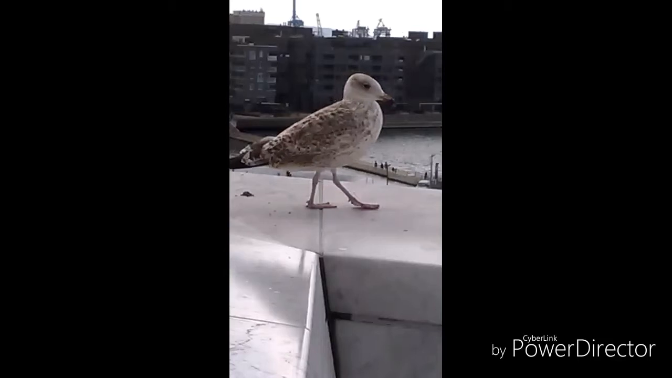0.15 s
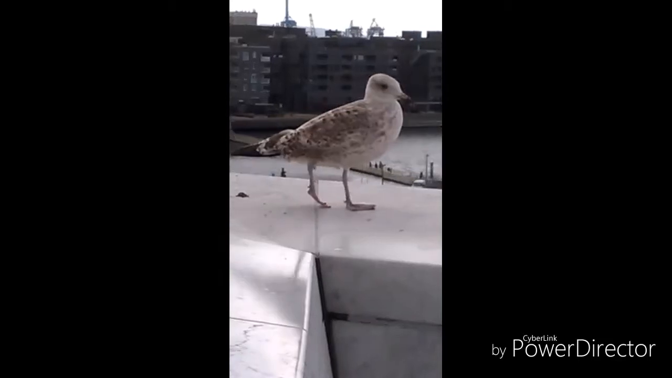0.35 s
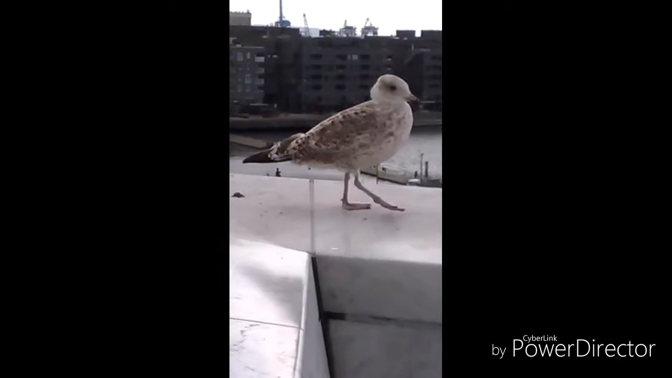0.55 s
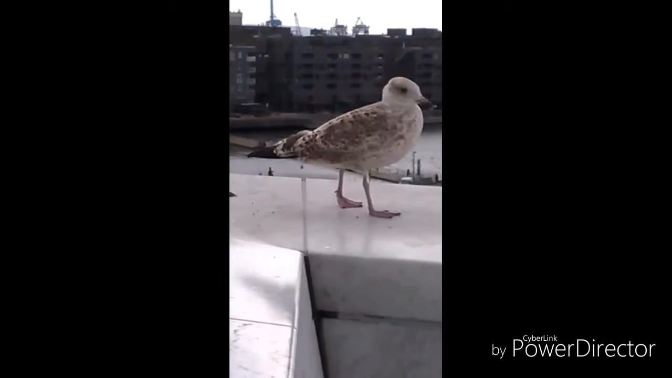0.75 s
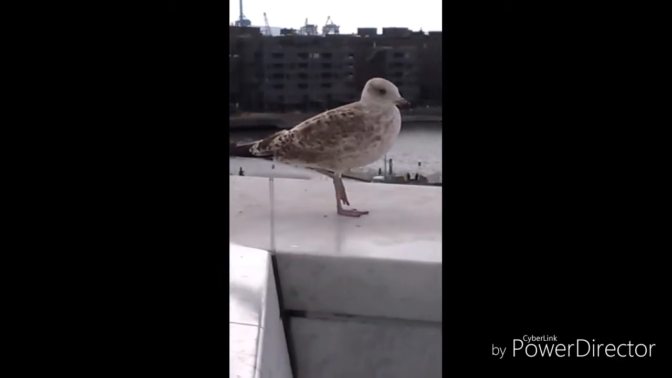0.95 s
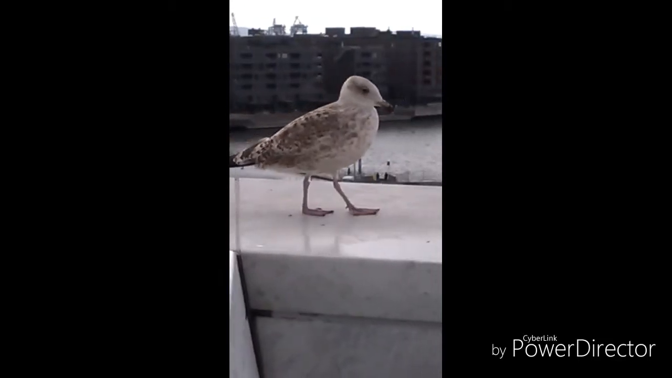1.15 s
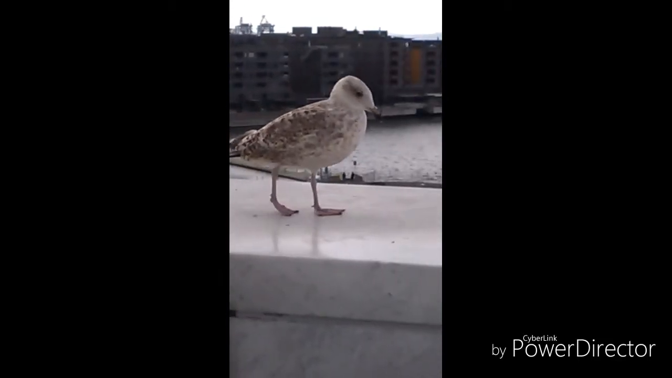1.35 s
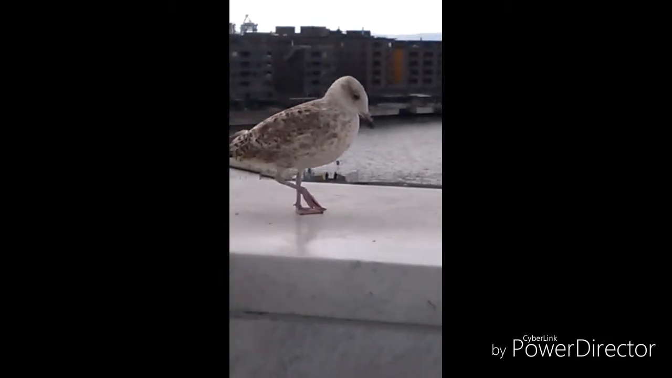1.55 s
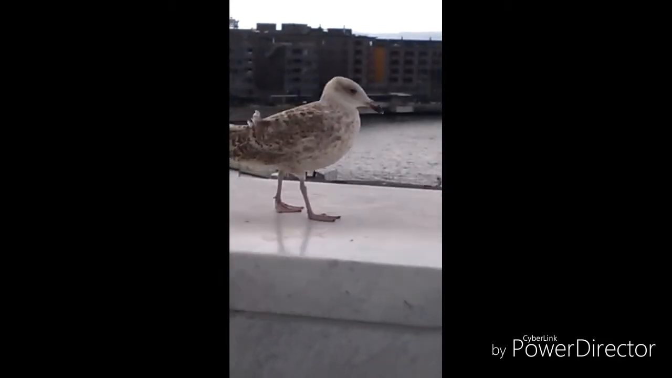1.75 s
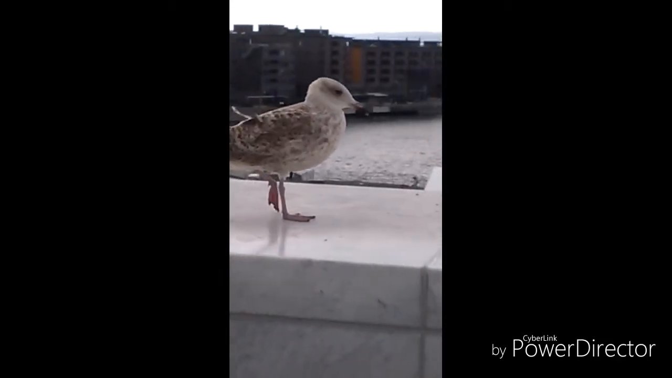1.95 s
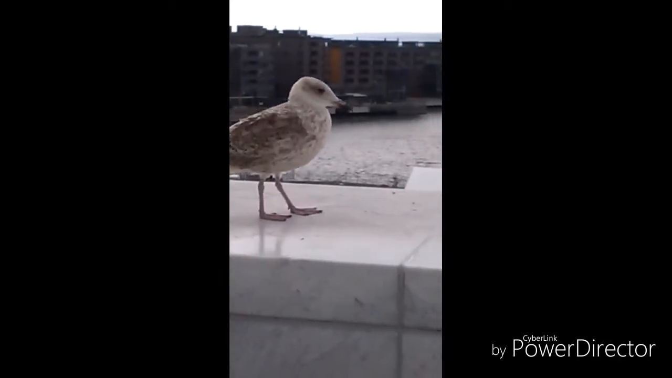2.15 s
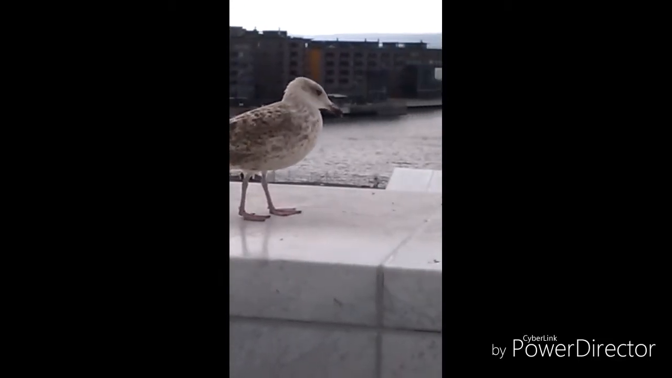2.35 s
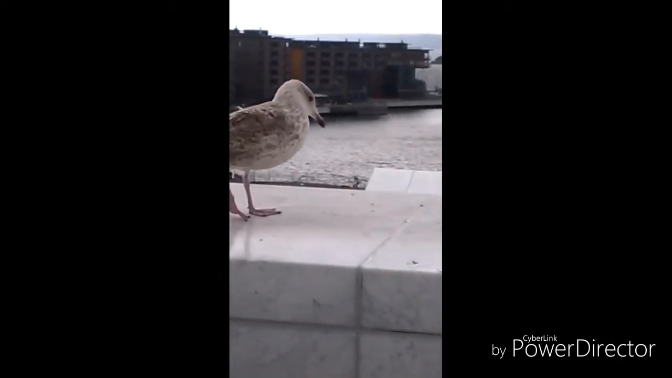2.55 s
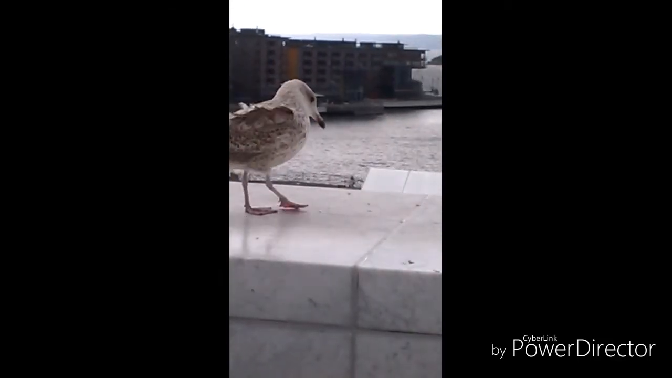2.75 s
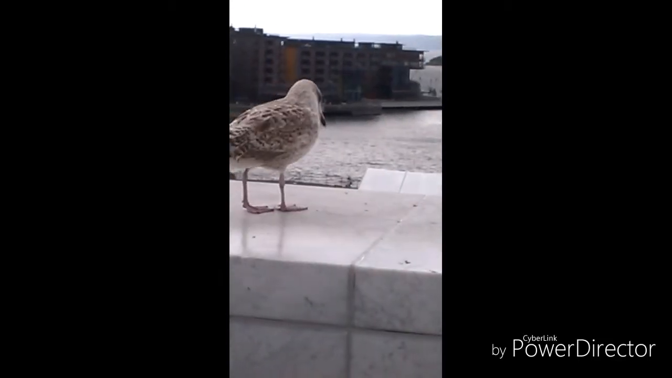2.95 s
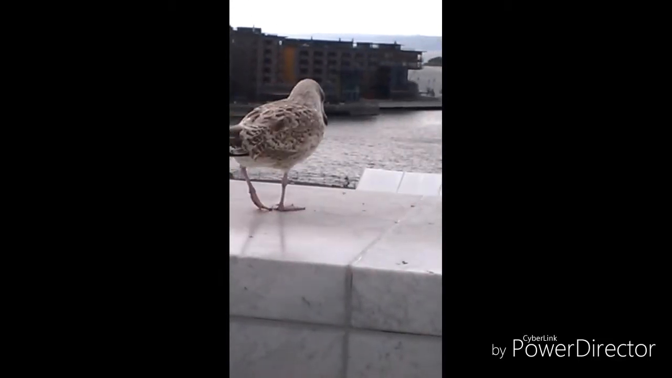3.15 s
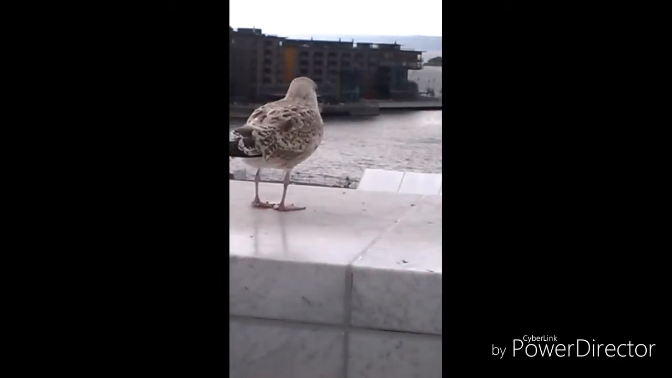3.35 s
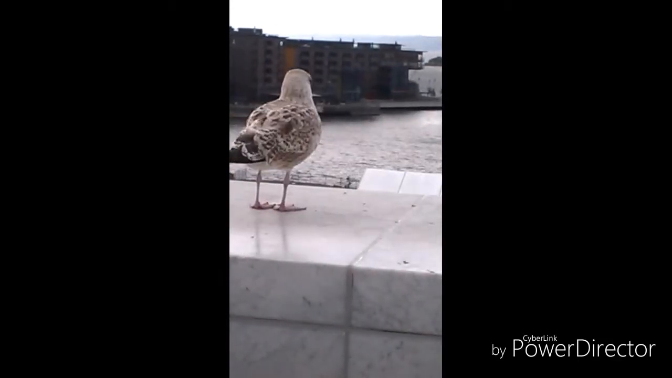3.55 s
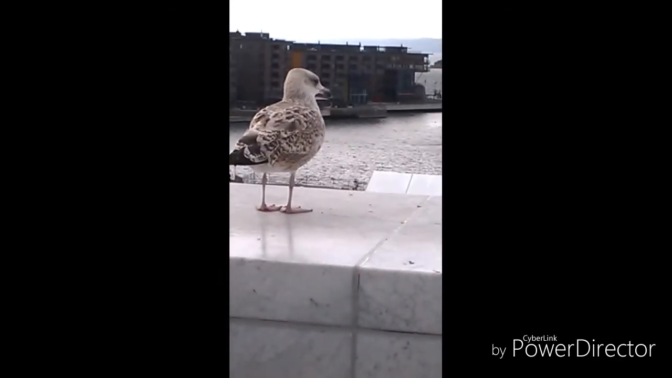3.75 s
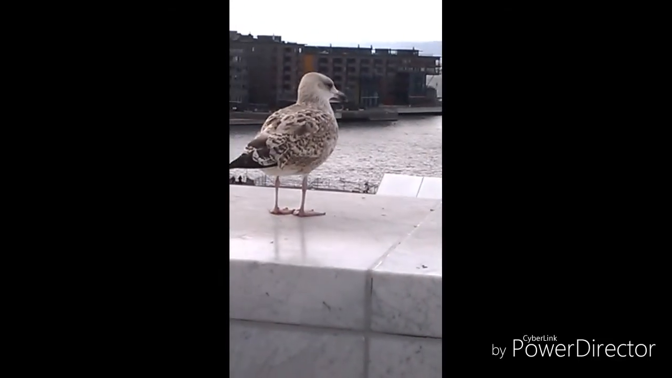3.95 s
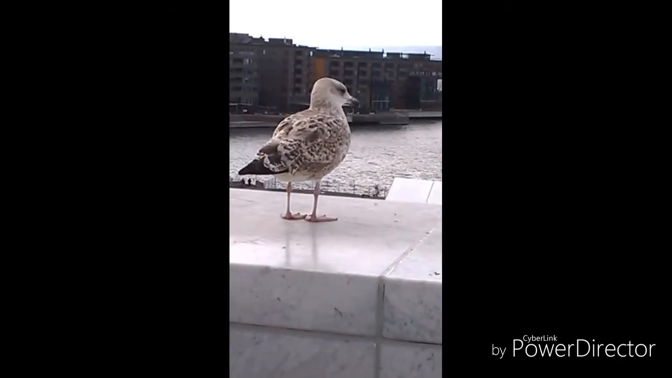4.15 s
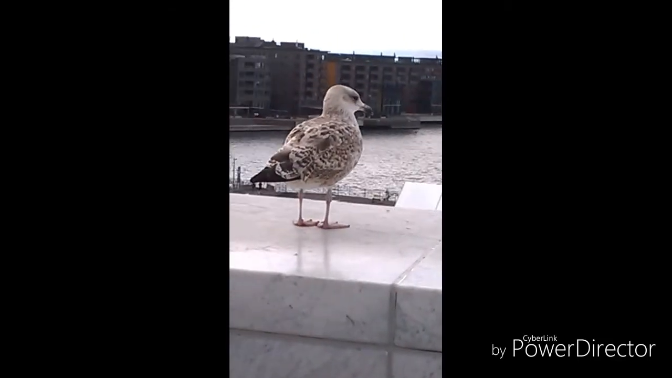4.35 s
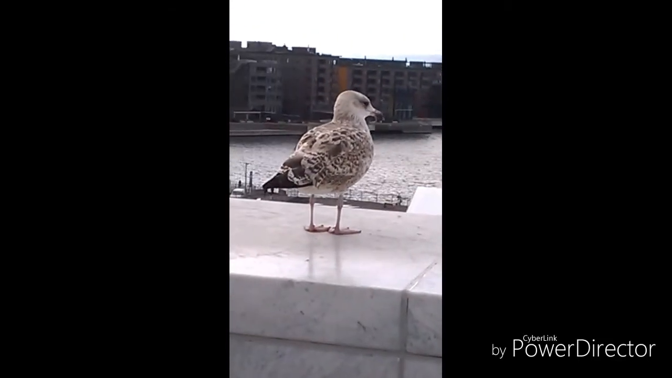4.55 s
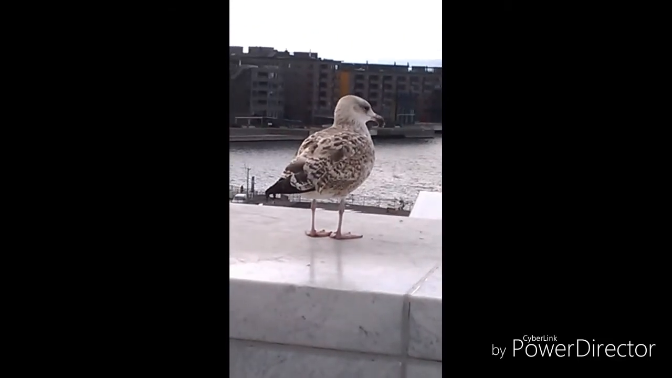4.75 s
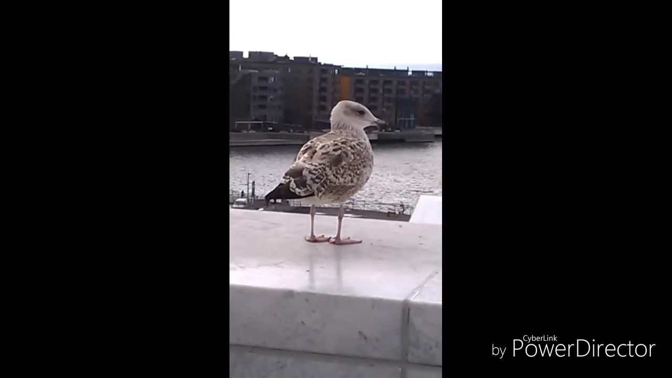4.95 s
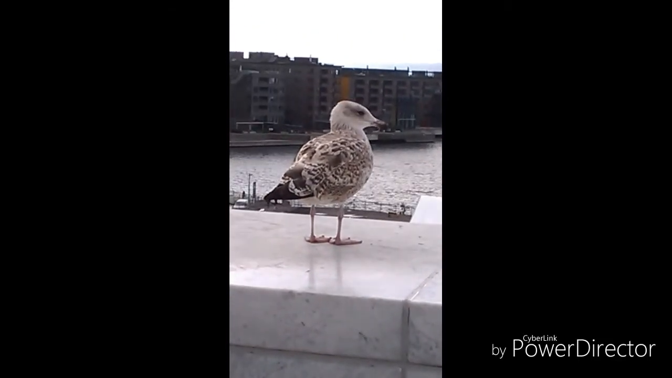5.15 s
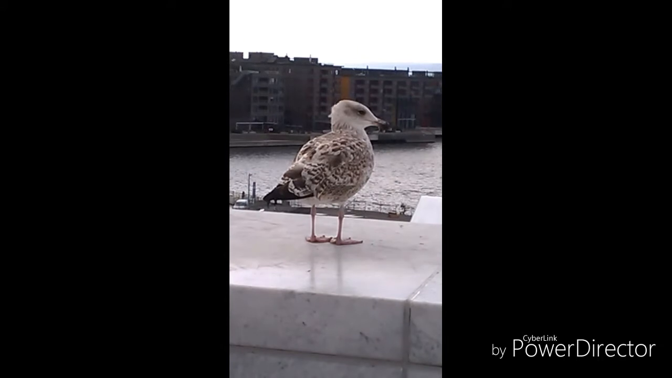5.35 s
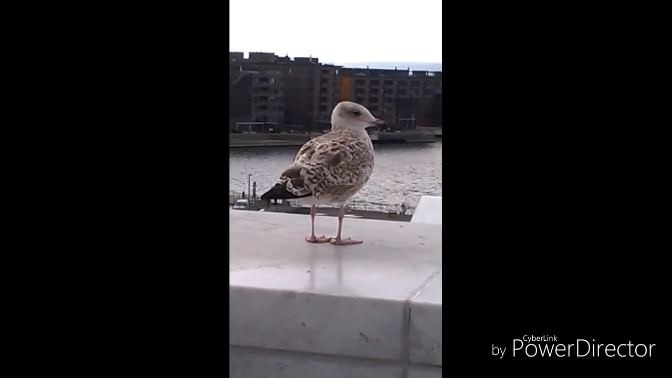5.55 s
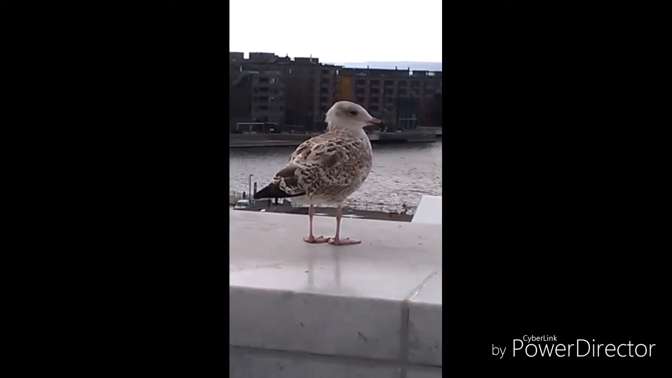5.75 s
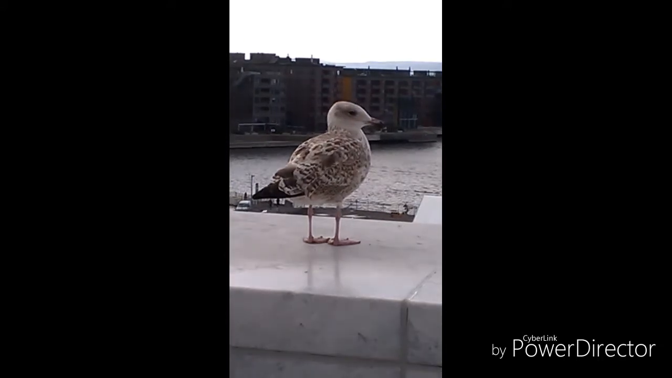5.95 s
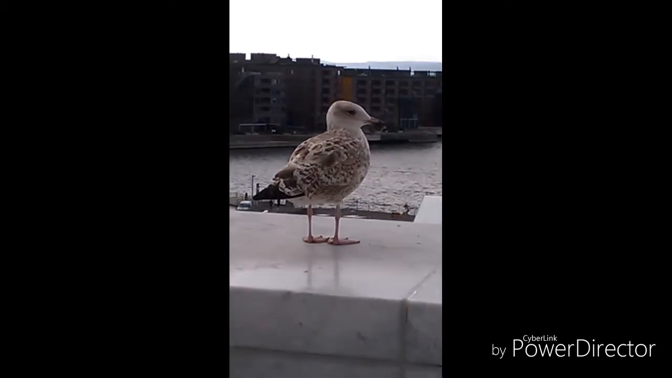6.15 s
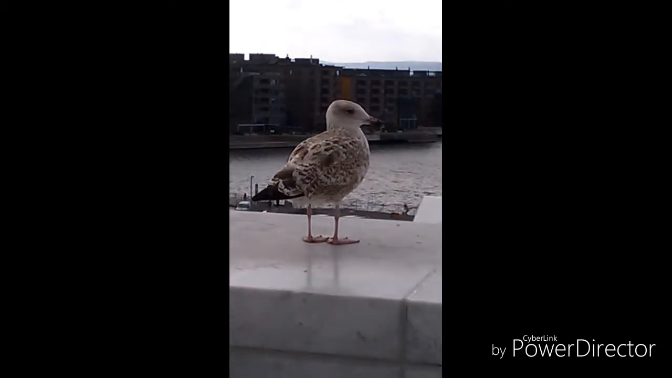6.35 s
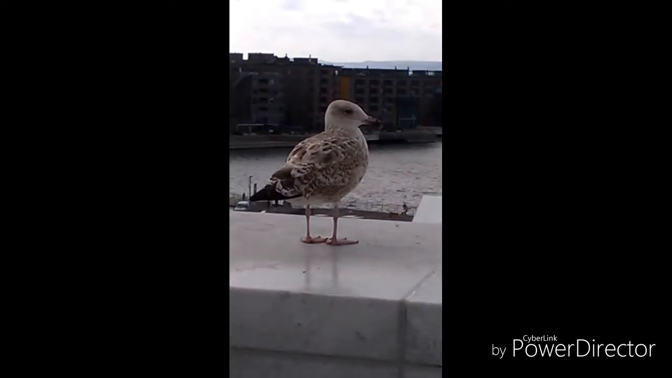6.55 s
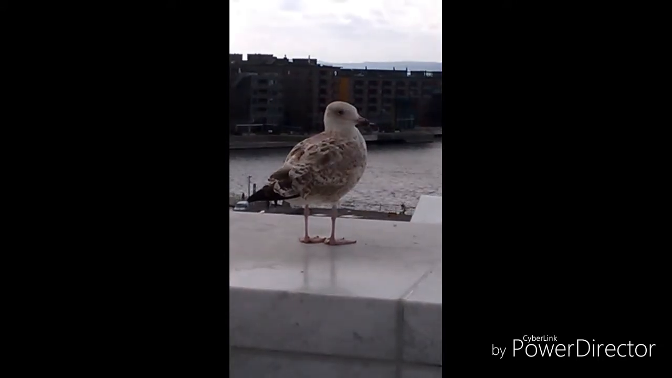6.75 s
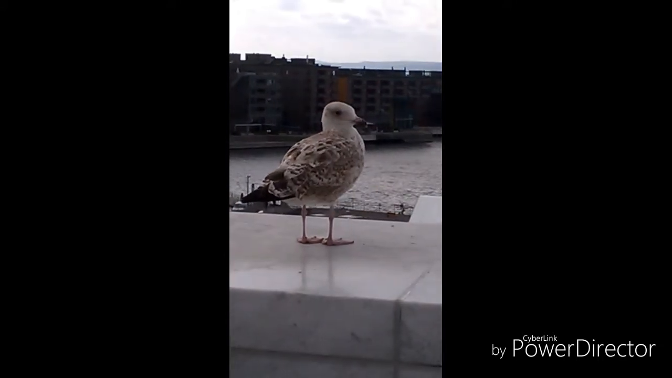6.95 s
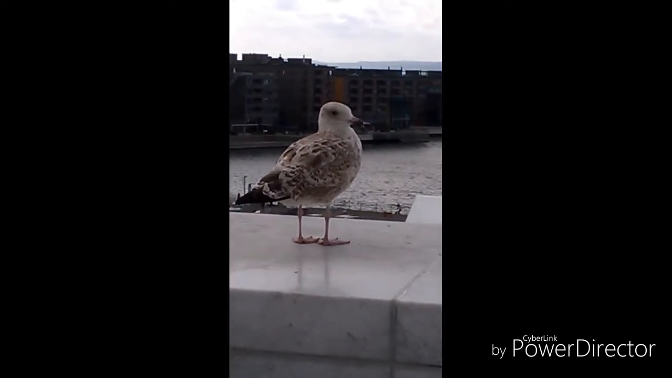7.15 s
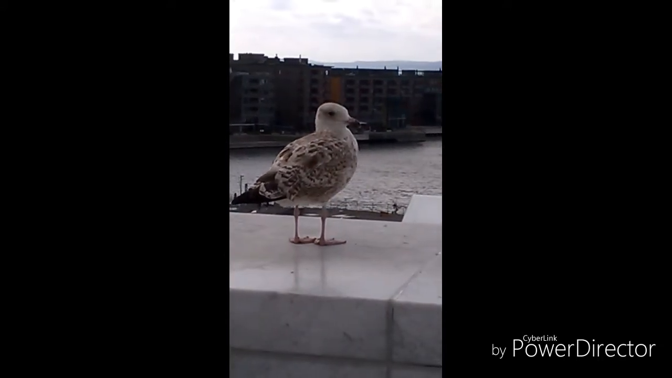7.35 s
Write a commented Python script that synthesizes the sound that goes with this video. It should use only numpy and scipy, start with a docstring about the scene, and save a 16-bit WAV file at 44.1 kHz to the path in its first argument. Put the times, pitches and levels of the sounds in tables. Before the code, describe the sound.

Over rushing wind, water and low town rumble, a nearby gull calls in a long, echoing series of yelps while distant gulls join in.

```python
"""Wind and water rush over the low rumble of a town, swelling in gusts. Young gulls whistle far off and
a foot scuffs the stone. Then a gull on the harbour wall gives a long call: one held note and a run of
yelps that each crack into a lower voice. The call has one wide echo, and a second gull and a faint
colony join in. Each cry is a wavering tone, made by a vibrating membrane in the bird's voice box;
the wind, water, town and scuff are shaped noise."""
import sys
import numpy as np
from scipy import signal
from scipy.fft import rfft, irfft, next_fast_len
from scipy.io import wavfile
from scipy.ndimage import uniform_filter1d, map_coordinates

SR = 44100
rng = np.random.default_rng(int(sys.argv[2]) if len(sys.argv) > 2 else 0)


def put_to_file(sound):
    """Save the sound as 16-bit audio at rate SR, in the file named by the first command-line argument."""
    columns = np.atleast_2d(sound).T  # one column per channel
    safe = np.clip(columns, -1, 1)
    whole_steps = np.round(safe * 32767)
    wavfile.write(sys.argv[1], SR, whole_steps.astype(np.int16))


N = 326781
TIME = np.arange(N) / SR


def amp(db):
    """Turn decibels into a gain."""
    return 10 ** (np.asarray(db) / 20)


def unit(x):
    """Scale to an average power of 1."""
    return x / np.sqrt(np.mean(x ** 2) + 1e-20)


def along(points, hz):
    """Read a (frequency, value) table at hz, on a log axis."""
    freqs, values = np.transpose(points)
    return np.interp(np.log(hz + 1), np.log(freqs + 1), values)


def curves(rows, at):
    """Join a table's rows with straight lines: one curve for each column after the first."""
    places, *columns = np.transpose(rows)
    return [np.interp(at, places, column) for column in columns]


def wobble(rate, n=N):
    """A smooth random curve with `rate` new values a second."""
    return map_coordinates(rng.standard_normal(int(n * rate / SR) + 4), [np.arange(n) * rate / SR])


def filtered(x, response):
    """Scale each frequency in x by response(hz)."""
    size = next_fast_len(N + SR // 2)
    return irfft(rfft(x, size) * response(np.fft.rfftfreq(size, 1 / SR)), size)[..., :N]


def add(track, s, sound):
    """Mix a sound into a track at s seconds."""
    part = track[round(s * SR):][:len(sound)]
    part += sound[:len(part)]


def progress(length):
    """Go from 0 to 1 over `length` seconds."""
    return np.linspace(0, 1, round(length * SR))


def spread(x, width):
    """Make stereo: width 0 is centred, 0.5 is left, -0.5 is right."""
    mid, side = np.cos(width * np.pi / 2), np.sin(width * np.pi / 2)
    return x * np.array([[mid + side], [mid - side]])


# How alike the noise is in the two ears: f/Hz, likeness (1 = the same)
EAR_LIKENESS = [(40, .05), (120, 0.31), (300, 0.28), (700, 0.67), (1500, 0.84), (5000, 0.8), (9000, 0.67),
                (14000, 0.54)]

def noise(spectrum, lo_hz, hi_hz, patchy_db):
    """A band of stereo noise in which patches drift louder and softer."""
    white = signal.stft(rng.standard_normal((2, N)), nperseg=512)[2]
    patches = uniform_filter1d(rng.standard_normal(white.shape[1:]), size=6, axis=0)
    patches = uniform_filter1d(patches, size=14, axis=1)
    pair = signal.istft(white * amp(patchy_db * unit(patches)), nperseg=512)[1][:, :N]

    def response(hz):
        band = ((1 + (lo_hz / (hz + 1)) ** 6) * (1 + (hz / hi_hz) ** 6)) ** -.5
        angle = np.arccos(np.clip(along(EAR_LIKENESS, hz), -1, 1)) / 2
        return band * amp(along(spectrum, hz)) * [np.cos(angle), np.sin(angle)]

    mid, side = filtered(pair, response)
    return unit(np.array([mid + side, mid - side]))


# The town's loudness: t/s, relative level/dB
TOWN_LEVELS = [(0.5, -49.5), (3.46, -49), (3.82, -47.5), (5.9, -47), (7.4, -47.5)]
# Its tone colour: f/Hz, relative level/dB
TOWN_SPECTRUM = [(13, -41), (22, -18), (43, -2.5), (81, -2.5), (113, -1), (226, -6.5), (400, -7),
                 (520, -13), (880, -120)]

def town_rumble():
    """The town makes a low, nearly steady rumble."""
    level_db = curves(TOWN_LEVELS, TIME)[0] + 3 + .28 * wobble(7.4)
    return amp(level_db) * noise(TOWN_SPECTRUM, 28, 330, patchy_db=.1)


# The rush in three bands: t/s, then relative level/dB of body (low), wash (middle), spray (high)
RUSH_LEVELS = [(0.28, -46, -46.5, -57), (0.38, -43.5, -44.5, -55.5), (0.7, -44, -46, -56.5),
               (0.92, -48.5, -47, -58), (1.33, -49, -49, -57), (1.62, -49.5, -49.5, -59),
               (2.1, -49, -51.5, -61.5), (2.52, -47.5, -51.5, -59.5), (2.77, -47.5, -51, -58),
               (2.97, -46, -50, -59), (3.74, -47, -47.5, -57.5), (4.1, -44.5, -45.5, -55),
               (4.39, -46, -41.5, -51), (4.6, -40.5, -42.5, -51), (5.03, -44.5, -42.5, -51.5),
               (5.26, -43.5, -43, -53), (5.68, -47.5, -45.5, -55.5), (6.07, -48.5, -46.5, -54),
               (6.59, -45, -46.5, -56.5), (7.4, -53.5, -52, -57)]
# Tone colours of the rush and of the finest spray: f/Hz, relative level/dB
RUSH_SPECTRUM = [(120, -35), (200, 1.5), (310, -2.5), (371, -1.5), (471, -2), (554, -1.5), (858, -1.5),
                 (1590, -1.5), (2560, -5), (2900, -5.5), (3120, -5.5), (3420, -5), (4920, -10),
                 (8350, -23.5), (15500, -29)]
SIZZLE_SPECTRUM = [(8300, -14), (9600, 0), (11000, -14)]

def wind_and_water():
    """A broad rush that brightens in gusts, over a faint even hiss."""
    body_db, wash_db, spray_db = curves(RUSH_LEVELS, TIME)
    ripple_db = .21 * wobble(14)
    body = amp(body_db + 2 + ripple_db + .28 * wobble(8)) * noise(RUSH_SPECTRUM, 252, 1110, 1.5)
    wash = amp(wash_db + 4.5 + ripple_db) * noise(RUSH_SPECTRUM, 1034, 4000, patchy_db=1.82)
    spray = amp(spray_db + 4.5 + ripple_db) * noise(RUSH_SPECTRUM, 5520, 9600, patchy_db=1)
    sizzle_db = -65 + 1.6 * (spray_db - spray_db.max())  # fine spray at the top of the gust
    sizzle = amp(sizzle_db) * noise(SIZZLE_SPECTRUM, 8000, 11500, patchy_db=1)
    hiss = amp(-61.5) * noise([(8000, .5), (15000, -6.5), (17000, -20)], 9400, 20000, patchy_db=1)
    return body + wash + spray + sizzle + hiss


def wind_buffet():
    """Deep, uneven puffs of wind, mostly on the left."""
    puffs = amp(-50 + 2.2 * wobble(5.5)) * noise([(25, -1), (100, 1)], 36, 89, patchy_db=-1)
    return puffs * amp([[0], [-14]])


def hollow_gust(peak_s=4.62, half_length_s=.16, db=-47):
    """The wind briefly sounds hollow at the top of the gust."""
    swell = np.exp(-.5 * ((TIME - peak_s) / half_length_s) ** 2)
    return amp(db) * swell * noise([(520, -14), (660, 0), (900, -10)], 500, 1000, patchy_db=1.5)


# How long the walls ring: f/Hz, time to fade by 60 dB/s
WALL_DECAY = [(300, 0.2), (3000, 1), (9000, 0.061)]

def wall_reverb(x):
    """Stone walls scatter the sound into a fading tail, different in each ear."""
    hz, t, white = signal.stft(rng.standard_normal((2, SR // 2)), SR, nperseg=256)
    fade = amp(-60 * t / along(WALL_DECAY, hz)[:, None])
    tail = signal.istft(white * fade, SR, nperseg=256)[1]
    return signal.fftconvolve(x[None], tail / np.linalg.norm(tail[0]), axes=1)[:, :N]


def wide_echo(x, delay_s=.50077, db=-7):
    """The call returns once; flipping the wave in one ear makes it sound wide."""
    delayed = np.pad(x, (round(delay_s * SR), 0))[:N]
    return amp(db) * delayed * np.array([[1], [-1]])


def burst(lo_hz, hi_hz, fade_s):
    """A tiny impact: noise that starts at once and drops 60 dB in fade_s."""
    t = np.arange(SR // 10) / SR
    band = signal.butter(2, [lo_hz, hi_hz], "band", fs=SR, output="sos")
    return unit(signal.sosfilt(band, rng.standard_normal(len(t)))) * amp(-60 * t / fade_s)


# The foot's small contacts: t/s, relative level/dB, knock f/Hz
FOOT_CONTACTS = [(1.7587, -31, 1660), (1.7778, -28, 1520), (1.7884, -32, 1980), (1.8233, -33, 2160),
                 (1.846, -36, 1220)]

def scuff(tick_s=1.8014, tick_hz=9500):
    """A foot scuffs the stone: dull knocks, each with a spit of grit, and one sharp tick."""
    out = np.zeros(N)
    for s, db, hz in FOOT_CONTACTS:
        knock = amp(-7.5) * burst(.8 * hz, 1.17 * hz, fade_s=.035)
        grit = amp(-11) * burst(2400, 4600, fade_s=.035)
        add(out, s, amp(db) * (knock + grit))
    add(out, tick_s, amp(-44) * burst(.85 * tick_hz, 1.18 * tick_hz, fade_s=.008))
    return out


def voice(pitch, harmonics_db, jitter=.0037, flutter_db=2.5, edge_s=.004, rasp=0):
    """An unsteady membrane sounds harmonics: tones at 1, 2, 3... times its pitch."""
    n = len(pitch)
    waver = 1 + jitter * (wobble(487, n) + .85 * wobble(70.5, n))
    phase = 2 * np.pi * np.cumsum(pitch * waver) / SR
    from_edge = np.minimum(np.arange(n), np.arange(n)[::-1])
    fade = np.sin(np.pi / 2 * np.clip(from_edge / (edge_s * SR), 0, 1))
    shared_flutter = wobble(100, n)
    note = np.zeros(n)
    for k, db in enumerate(harmonics_db, 1):
        flutter = unit(amp(flutter_db * (.8 * shared_flutter + .7 * wobble(170, n))))
        # rasp smears the tone into noise: 0 is pure, 1 is fully hoarse
        hoarse = np.sqrt(1 - rasp) + np.sqrt(rasp / 2) * (wobble(600, n) + 1j * wobble(600, n))
        note += amp(db) * flutter * np.imag(hoarse * np.exp(1j * k * phase))
    return np.sqrt(2) * fade * note


def colony(first_s=3.5, last_s=7.3, count=18):
    """Distant gulls give faint, falling yelps at random times."""
    out = np.zeros(N)
    for when, size, height, faintness in rng.random((count, 4)):
        pitch = curves(YELP_SHAPE, progress(.041 + .079 * size))[0] * (.95 + .21 * height)
        harmonics_db = -56.5 - 6 * faintness + np.array([-4, 4, 2])
        cry = voice(pitch, harmonics_db, jitter=.01, flutter_db=3, edge_s=.015, rasp=.3)
        add(out, first_s + when * (last_s - first_s), cry)
    return out


def whistle(length, path_hz, db, rasp):
    """One tone gliding through a start, a middle and an end pitch."""
    pitch = np.polyval(np.polyfit([0, .5, 1], path_hz, 2), progress(length))
    return voice(pitch, [db], jitter=.002, flutter_db=3, edge_s=.025, rasp=rasp)


# Rising peeps: t/s, level/dB, starting f/Hz
RISING_PEEPS = [(1.655, -53.5, 2950), (2.11, -53, 2930), (3.34, -53, 3090), (4.56, -49, 3000),
                (5.8, -48.5, 2950), (6.905, -48, 3620)]
# High whistles that rise and fall: t/s, length/s, level/dB, rasp (0-1), pitch factor
HIGH_ARCHES = [(1.36, .14, -57, .3, .99), (2.961, .15, -52, .1, .997), (2.66, .19, -54, .5, 1.02),
               (3.196, .11, -54.5, .5, 1.05), (3.68, .17, -54, .5, 1.05), (4.205, .17, -48, .2, 1.0)]
# Hoarse falling squeals: t/s, length/s, level/dB
FALLING_SQUEALS = [(.79, .11, -52), (2.341, 0.22, -50.5), (6.376, .2, -51), (7.094, .13, -46.5)]

def young_gulls(peep_end_hz=4114, arch_hz=(4820, 5080, 4230), squeal_hz=(4300, 3760, 3120)):
    """Young gulls whistle far off: peeps and arches to the left, squeals to the right."""
    peeps, arches, squeals = np.zeros((3, N))
    for s, db, start_hz in RISING_PEEPS:
        path_hz = start_hz + (peep_end_hz - start_hz) * np.array([0, .63, 1])
        add(peeps, s, whistle(.19, path_hz, db, rasp=.08))
    for s, length, db, rasp, height in HIGH_ARCHES:
        add(arches, s, whistle(length, height * np.array(arch_hz), db, rasp))
    for s, length, db in FALLING_SQUEALS:
        add(squeals, s, whistle(length, squeal_hz, db, rasp=.8))
    return spread(peeps, .5) + spread(arches, .19) + spread(squeals, -.24)


# A yelp's basic pitch: progress (0-1), f/Hz
YELP_SHAPE = [(0, 1427), (.2, 1438), (.48, 1431), (.72, 1362), (1, 1266)]
# The swell of its upper harmonics: progress (0-1), relative level/dB
YELP_LEVELS = [(0, -5.5), (.28, 0.5), (.5, .5), (.68, 4.5), (.84, 0.5), (1, -2)]
THROAT_HZ, THROAT_WIDTH_HZ = 1335, 32  # where the throat rings, and how narrowly

def yelp(length, db, lowest_db, height, lateness, fall, throat_hz=THROAT_HZ):
    """A note that falls at its end; its lowest tone blooms as it nears the pitch the throat rings at."""
    u = progress(length)
    delayed = u ** lateness  # above 1, the fall comes later
    start_hz = YELP_SHAPE[0][1]
    bend_hz = curves(YELP_SHAPE, delayed)[0] - start_hz
    pitch = height * (start_hz + fall * bend_hz)
    swell_db = curves(YELP_LEVELS, delayed)[0]
    bloom_db = -((pitch - throat_hz) / THROAT_WIDTH_HZ) ** 2
    third_db = lowest_db - 20.5 + 11 * u + swell_db  # the third harmonic grows through the note
    return voice(pitch, [db + lowest_db + bloom_db, db + swell_db, db + third_db], rasp=.03)


# A crack's basic pitch: progress (0-1), f/Hz
CRACK_SHAPE = [(0, 1112), (.4, 1093), (1, 1036)]
# Its swell: progress (0-1), relative level/dB
CRACK_LEVELS = [(0, -2), (.25, 2.5), (.55, 1.5), (.72, 0), (1, -4)]
# Its harmonics, lowest first: relative level/dB
CRACK_COLOUR = [-7.5, -7.5, 0.5, -3, -18.5, -23]

def crack(length, db, height=1, slide=0, rasp=.13):
    """The voice breaks to a lower note, rich in harmonics; a positive slide steepens its fall."""
    u = progress(length)
    swell_db = db + curves(CRACK_LEVELS, u)[0]
    pitch = height * curves(CRACK_SHAPE, u)[0] * (1 + slide * (.5 - u))
    return voice(pitch, [swell_db + h for h in CRACK_COLOUR], jitter=.0079, rasp=rasp)


# The second gull's cries: crack t/s, yelp level/dB, crack level/dB
ANSWER_YELPS = [(4.32, -44, -55), (4.658, -42.5, -54), (4.925, -39.5, -55), (5.225, -45, -56),
                (5.769, -47, -54), (6.07, -44, -56), (6.346, -57, -51), (6.69, -51, -47.5),
                (6.995, -56, -47.5)]

def second_gull(yelp_s=.09, crack_s=.065, height=1.037):
    """A farther gull joins in with shorter, higher yelps; towards the end its cracks take over."""
    out = np.zeros(N)
    for s, db, crack_db in ANSWER_YELPS:
        add(out, s - yelp_s, yelp(yelp_s, db, lowest_db=-9, height=height, lateness=1.58, fall=.75))
        add(out, s, crack(crack_s, crack_db, height, slide=.015, rasp=.3))
    return out


# The opening note: t/s, f/Hz, then level/dB of harmonics 1, 2 and 3
HELD_NOTE = [(2.24, 1390, -57, -41, -52), (2.26, 1459, -43, -42, -48), (2.328, 1430, -42.5, -66, -52),
             (2.472, 1414, -45, -56, -62), (2.496, 1440, -40, -44.5, -62),
             (2.578, 1462, -37.5, -40.5, -50.5), (2.694, 1491, -36.5, -37.5, -60),
             (2.73, 1453, -37, -34, -41), (2.757, 1406, -41, -45, -42)]
# The yelps: crack t/s, yelp length/s, crack length/s, yelp level/dB, crack level/dB, fall factor
YELP_RUN = [(3.112, 0.076, 0.047, -39.5, -40.5, 0.64), (3.481, 0.11, .038, -39.5, -40, .85),
            (3.835, .11, 0.033, -40, -41, .9), (4.185, 0.12, 0.038, -39.5, -40, 0.9),
            (4.536, 0.11, .03, -40.5, -43.5, 1.0), (4.857, 0.099, 0.042, -39.5, -38.5, 0.92),
            (5.201, 0.1, 0.044, -37, -40.5, 1.0), (5.515, 0.12, 0.037, -38.5, -41, 1.0),
            (5.842, .11, 0.0495, -38.5, -40.5, 1.0), (6.191, .11, .054, -41.5, -41.5, 0.95),
            (6.521, .08, .06, -40.5, -42.5, 0.96), (6.868, 0.086, .048, -37.5, -40.5, 0.97),
            (7.186, 0.091, 0.063, -37.5, -40, 1.05)]
# Soft rising mews between yelps: t/s, length/s, level/dB
SOFT_MEWS = [(2.939, 0.11, -45), (3.307, 0.084, -42.5), (3.652, 0.068, -44.5), (4.018, 0.056, -42),
             (5.663, 0.047, -43), (6.93, 0.058, -44)]
# A mew's pitch: progress (0-1), f/Hz
MEW_SHAPE = [(0, 1196), (.6, 1242), (1, 1295)]
# Its harmonics, lowest first: relative level/dB
MEW_COLOUR = [0, -6, -17]

def long_call(mid_run_s=4.5):
    """The near gull holds a note, then yelps, with soft mews between; each loud note ends in a crack."""
    out = np.zeros(N)
    start_s, end_s = HELD_NOTE[0][0], HELD_NOTE[-1][0]
    pitch, *harmonics_db = curves(HELD_NOTE, np.arange(start_s, end_s, 1 / SR))
    add(out, start_s, voice(pitch, harmonics_db, jitter=.0028, flutter_db=.8))
    add(out, 2.758, crack(length=.0275, db=-38.5))
    for s, length, crack_s, db, crack_db, fall in YELP_RUN:
        late_s = s - mid_run_s  # later yelps are thinner and lower, and their cracks fall less
        note = yelp(length, db, lowest_db=2.5 - 2.2 * late_s, height=1 - .00522 * late_s,
                    lateness=1 + .097 * late_s, fall=fall, throat_hz=THROAT_HZ - 25 * late_s)
        add(out, s - length, note)
        add(out, s, crack(crack_s, crack_db, slide=-.008 * late_s))
    for s, length, db in SOFT_MEWS:
        pitch = curves(MEW_SHAPE, progress(length))[0]
        add(out, s, voice(pitch, [db + h for h in MEW_COLOUR], edge_s=.014, rasp=.22))
    return out


def scene():
    """The calling gull straight ahead, with the others and the harbour all around."""
    near = long_call()
    far = young_gulls() + second_gull() + colony()
    reverb = wall_reverb(amp(-21) * near + amp(-11) * far[0])
    foot = scuff()
    background = wind_and_water() + town_rumble() + wind_buffet() + hollow_gust()
    return background + reverb + foot + far + wide_echo(near) + near


def record(dry):
    """The sound starts after a moment of silence, with the very highest treble cut off."""
    start_s, top_hz = .268, 15450
    fade_in = np.clip((TIME - start_s) / .012 + .35, 0, 1)
    return filtered(dry * fade_in, lambda hz: hz < top_hz)


dry = scene()
out = record(dry)
put_to_file(out)
```